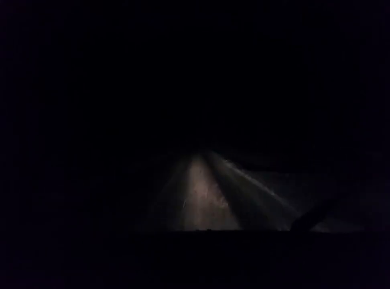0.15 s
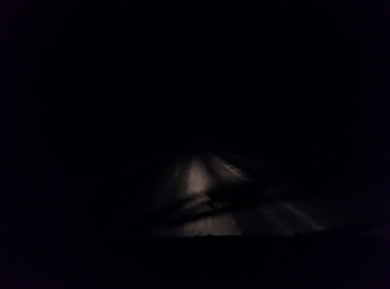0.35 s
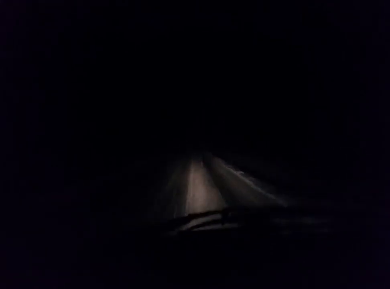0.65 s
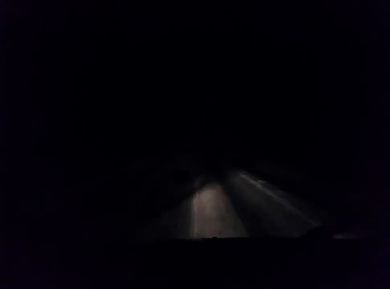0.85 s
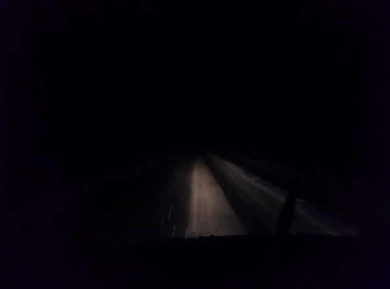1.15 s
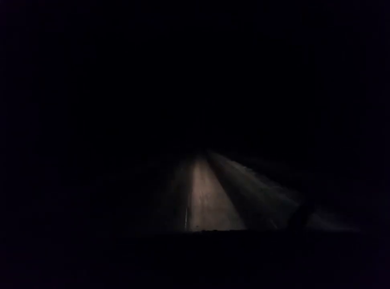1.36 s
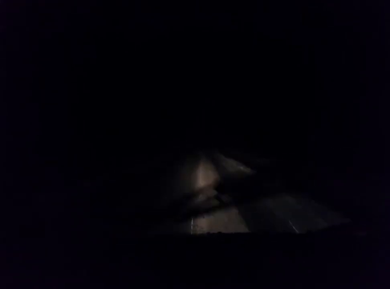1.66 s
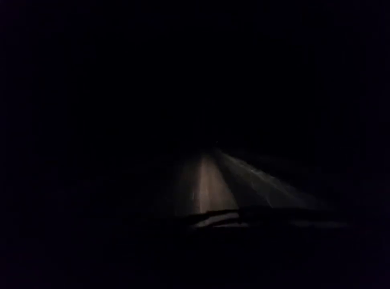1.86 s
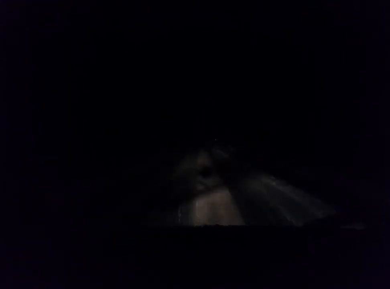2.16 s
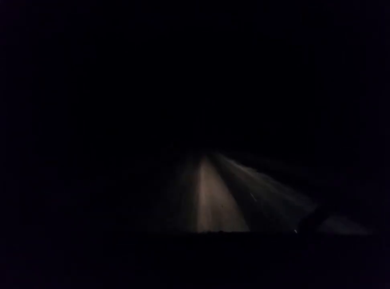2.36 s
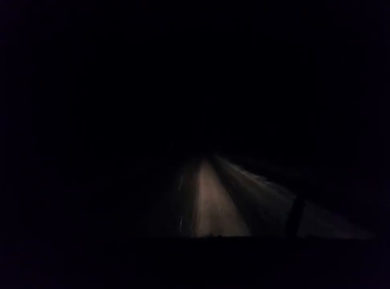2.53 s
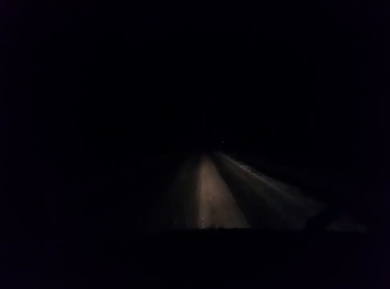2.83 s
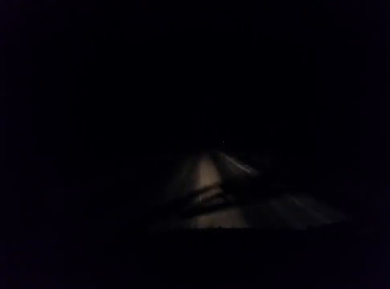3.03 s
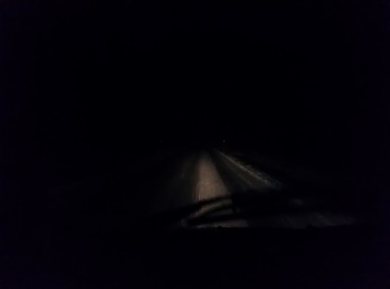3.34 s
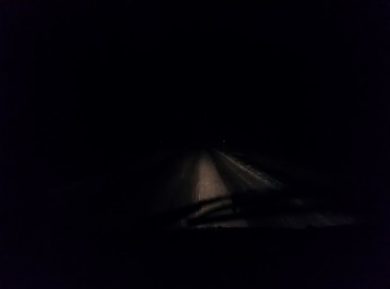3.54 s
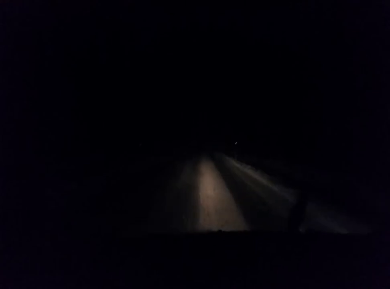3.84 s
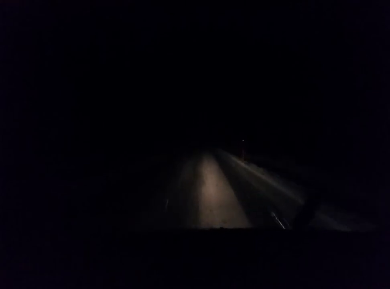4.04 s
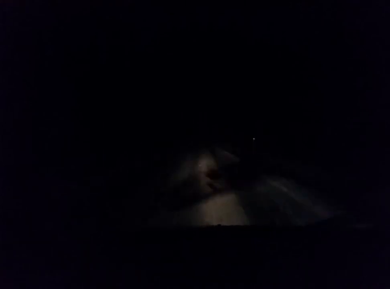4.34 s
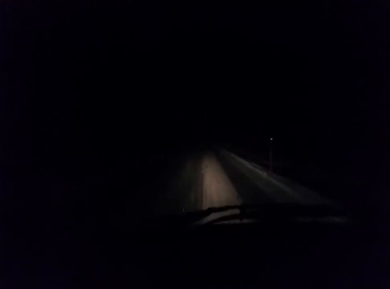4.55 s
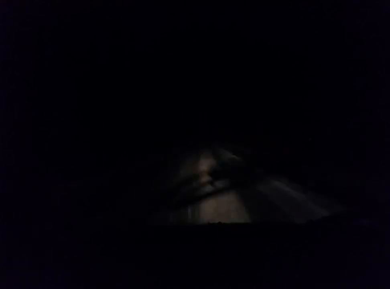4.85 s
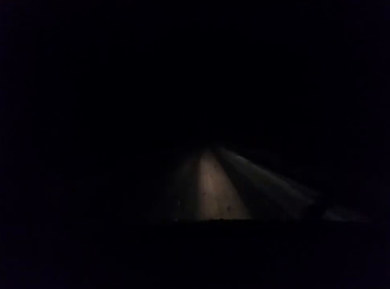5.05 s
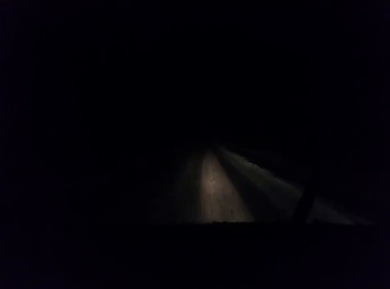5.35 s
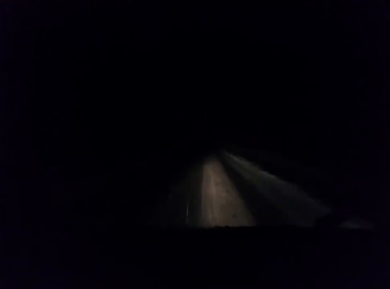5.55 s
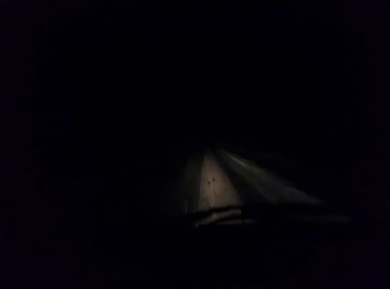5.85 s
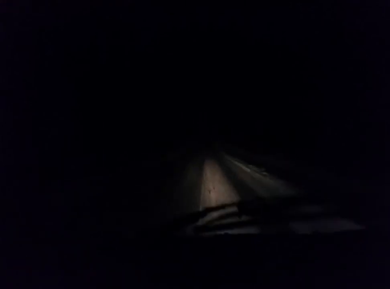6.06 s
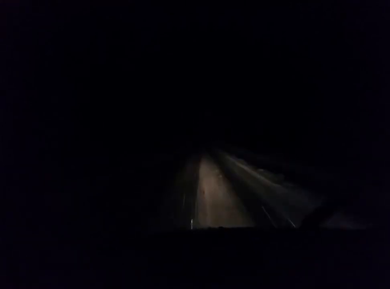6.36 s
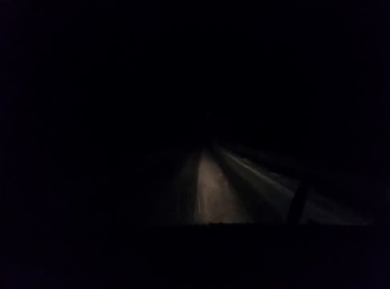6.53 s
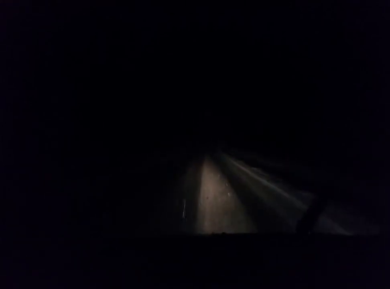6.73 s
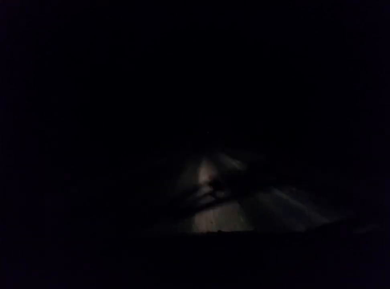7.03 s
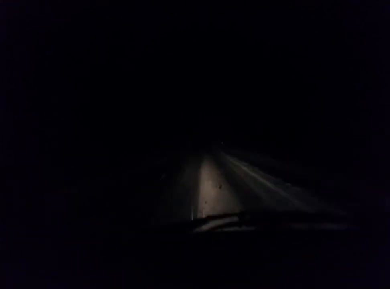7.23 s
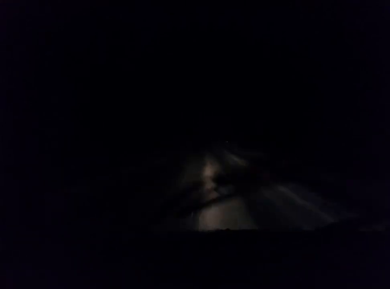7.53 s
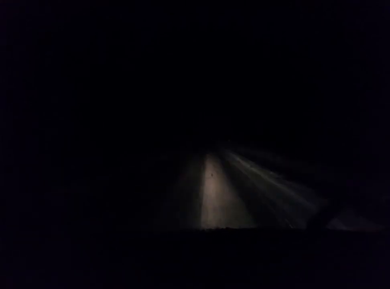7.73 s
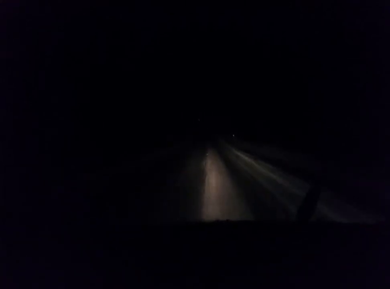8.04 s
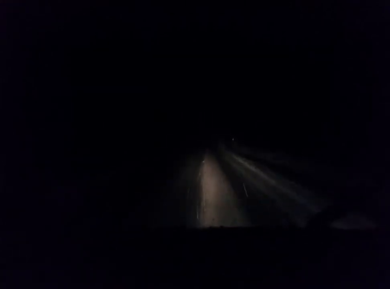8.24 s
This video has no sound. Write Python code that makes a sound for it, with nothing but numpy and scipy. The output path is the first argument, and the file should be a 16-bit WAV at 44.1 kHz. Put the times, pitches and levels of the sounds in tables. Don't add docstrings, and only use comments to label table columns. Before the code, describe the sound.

Inside a car driving on a slushy road at night, heard by a stereo phone on the dashboard. From 0 to 8.4 seconds a low engine hum holds steady revs, wavering slightly in strength, over suspension thumps, body rumble, booming floor panels, broad tyre roar and thin spray hiss. Wipers cross the wet glass throughout. A click at 0.04 leads to a rub and judder at 0.2-0.55. A clear click at 1.45 precedes stuttering drag until 1.9. A loud click at 2.76 is followed by deep groaning and rubbing to 3.2. Another click at 4.08 brings shorter drags until 4.55. A soft, knocking flip at 5.45 precedes the roughest judder and groan, 5.65-5.86. A loud click at 6.77 leads to a longer rub until 7.26. Clicks at 8.14 and 8.23 begin one last drag, cut off with the drone still running.

```python
import sys
import numpy as np
from scipy import signal
from scipy.fft import rfft, irfft
from scipy.io import wavfile
from scipy.ndimage import uniform_filter1d, minimum_filter1d

SR = 44100
rng = np.random.default_rng(int(sys.argv[2]) if len(sys.argv) > 2 else 0)


def to_wav(s):
    ch = np.atleast_2d(s).T
    pcm = np.round(np.clip(ch, -1, 1) * 32767)
    wavfile.write(sys.argv[1], SR, pcm.astype(np.int16))


def invert_db(x):
    u = np.asarray(x, float) / 20
    return 10 ** u


N = 369999
HZ = np.fft.rfftfreq(N, 1 / SR)
TIME = np.arange(N) / SR

# t/s, bumps under the suspension level/dB, slush depth against the usual/dB
ROAD_SURFACE = [(0.0, -23, 2), (0.7, -22, 0.5), (1.1, -18.5, 0), (1.45, -21.5, 0.5), (1.8, -25, 1),
                (2.2, -16.5, 0.5), (2.7, -21.5, 1.5), (3.2, -22.5, -0.5), (3.6, -28.5, -2),
                (4.1, -18, -0.5), (4.9, -22, -1.5), (5.4, -23.5, 0), (5.8, -23, 2), (6.2, -24.5, -1.5),
                (6.7, -21, 0), (7.6, -22.5, -0.5), (8.05, -25.5, -0.5), (8.39, -21, 0.5)]
# f/Hz, level/dB per Hz
GLASS_TONE = [(250, -25.5), (400, 1.5), (500, 2), (800, 0.5), (1000, -8.5), (1400, -10), (2000, -19),
              (3200, -23.5), (3600, -28.5), (5000, -31.5), (7500, -47.5)]


def table(points):
    hz, value = np.transpose(points)
    return np.interp(np.log(HZ + 1), np.log(hz), value)


def curves(rows):
    s, *columns = np.transpose(rows)
    return [np.interp(TIME, s, c) for c in columns]


def unit(x):
    return x / np.sqrt(np.mean(x ** 2))


def walk(rate):
    hold = int(SR / rate)
    steps = np.repeat(rng.standard_normal(N // hold + 1), hold)
    smooth = uniform_filter1d(uniform_filter1d(steps, hold), hold)
    return unit(smooth[:N])


def resonance(hz, width_hz):
    return 1 / (1 + 1j * (HZ - hz ** 2 / (HZ + 1e-9)) / width_hz)


def diffuse(gain, source=1):
    # f/Hz, side minus mid level/dB
    side_points = [(60, -17.5), (110, -20), (200, -12), (370, -8), (680, -8.5), (1240, 1.5), (2270, -1.5),
                   (4170, -0.5), (7630, 5.5), (14000, 6)]
    # f/Hz, left minus right level/dB
    lean_points = [(60, .2), (120, 1.5), (200, 2.3), (370, 1), (700, 1.5), (1240, -1.5), (1900, 3),
                   (3000, 1), (4200, 0), (5000, -2), (5400, -6), (6500, -5), (7500, -2)]
    mid, side = rfft(rng.standard_normal((2, N)) * source) * gain
    side = side * invert_db(table(side_points))
    lean = invert_db(table(lean_points) / 2)
    return unit(irfft(np.array([(mid + side) * lean, (mid - side) / lean]), N))


def strikes(times, peak_db, t60_s):
    out = np.zeros(N)
    for s, db in zip(times, peak_db):
        start = int(s * SR)
        age = TIME[start:int((s + .3) * SR)] - s
        out[start:start + len(age)] += invert_db(db - 60 * age / t60_s)
    return out


def ports(x):
    # f/Hz, width/Hz, level/dB
    port_modes = [
        [(9600, 2620, 2.5), (12630, 2600, -9), (14200, 2500, -16.5)],
        [(9700, 1900, -13), (11740, 1630, -2.5), (14200, 2800, -14)],
    ]
    gains = []
    for modes in port_modes:
        gains.append(sum((-1) ** k * invert_db(db) * resonance(hz, width) ** 2
                         for k, (hz, width, db) in enumerate(modes)))
    return irfft(rfft(x) * np.array(gains), N)


def strokes():
    # start t/s, length/s, drag rise/dB, change over the stroke/dB, squeak against usual/dB
    loads = [(0.225, .09, 8.5, 0, 0), (0.357, 0.15, 6, 0.5, 2.5), (1.52, .07, 3, 2.5, -2.5),
             (1.662, 0.064, 3, 1.5, 2.5), (1.801, 0.054, 3.5, 0.5, 2), (2.535, 0.18, 3.5, -4, -0.5),
             (2.896, 0.071, 8.5, -3, -3), (2.99, .23, 7, -3, 2), (4.2, 0.13, 5.5, 0.5, 1),
             (4.448, .09, 3.5, 0, 1), (5.65, .06, -0.5, 2.5, 1), (5.75, .14, 4, -1, 4.5),
             (6.934, 0.088, 5.5, 1, 0.5), (7.04, .22, 7, 0, -1), (8.225, 0.1, 6.5, -1, 0.5),
             (8.38, .05, 4.5, -2, 4)]
    attack_s, release_s = .04, .03
    rise_db, squeak_db = np.zeros((2, N))
    for s, length, db, change_db, bright_db in loads:
        edges = [s - attack_s, s, s + length, s + length + release_s]
        rise_db = rise_db + np.interp(TIME, edges, [0, db, db + change_db, 0])
        squeak_db = squeak_db + np.interp(TIME, edges, [0, bright_db, bright_db, 0])
    return rise_db, squeak_db


def engine():
    # t/s, level/dB
    load = [(0.0, -13.5), (0.65, -14.5), (1.4, -13), (2.2, -15.5), (2.4, -21), (2.7, -14), (3.4, -17),
            (3.7, -11.5), (4.15, -19), (4.38, -11.5), (4.75, -21), (5.05, -14), (5.7, -18), (6.9, -13.5),
            (7.6, -21), (8.1, -12), (8.39, -16)]
    # multiple of the engine cycle, level against the firing tone/dB
    orders = [(4, -17.5), (5, -25), (12, -13.5), (13, -10.5), (14, -13), (15, -18), (18, -14.5),
              (21, -22.5), (24, -29.5), (26, -36)]
    firing_hz = 61.42
    db, = curves(load)
    cycle = 2 * np.pi * firing_hz * TIME / 6
    tone = np.sin(6 * cycle)
    for multiple, order_db in orders:
        level = invert_db(order_db + 3.1 * walk(3.084))
        start_phase = 2 * np.pi * rng.random()
        tone = tone + level * np.sin(multiple * cycle + start_phase + 0.69 * walk(2.59))
    lean_db = np.array([[.3], [-.3]])
    return np.sqrt(2) * invert_db(db - 1.5 + lean_db) * tone


def suspension():
    # f/Hz, level/dB per Hz
    shake = [(12, -35), (20, -5), (54, -5), (70, -3.5), (91, -14.5), (110, -7.5), (140, -42), (240, -120)]
    bumps_db = curves(ROAD_SURFACE)[0]
    thump_gain = invert_db(np.minimum(table(shake), -9)) * (HZ < 66) * np.clip((HZ - 18) / 24, 0, 1)
    hum_gain = invert_db(table(shake)) * (HZ >= 66) * (HZ < 112)
    thump = invert_db(bumps_db + 3) * diffuse(thump_gain)
    hum = invert_db(-21.5 + 1.8 * walk(4)) * diffuse(hum_gain)
    return thump + hum


def floor_boom():
    # f/Hz, width/Hz, level/dB
    panels = [(123.1, 37, -1), (142.6, 34.7, 0), (193.6, 24, -5.5), (170.5, 16.3, -5)]
    slush_db = curves(ROAD_SURFACE)[1]
    motor_db = 0.54 * uniform_filter1d(strokes()[0], size=8000)
    power = sum(invert_db(2 * db) * abs(resonance(hz, width)) ** 4 for hz, width, db in panels)
    return invert_db(-16.02 + .6 * slush_db + motor_db) * diffuse(np.sqrt(power))


def tyre_roar():
    # f/Hz, level/dB per Hz
    tread = [(120, -42), (200, -2), (222, -11), (255, -4.5), (288, -10), (351, -14.5), (468, -13),
             (512, -17), (715, -18.5), (1060, -41.5), (1350, -23.5), (1620, -39), (2100, -29.5),
             (3680, -56.5), (7500, -58.5), (9750, -86.5), (16500, -120)]
    roar, swell = 0, walk(1.58)
    for hz in 200 * 2 ** np.arange(0, 5.6, .7):
        octaves_away = abs(np.log2((HZ + 1) / hz))
        share = np.clip(1 - octaves_away / 0.678, 0, 1)
        gain = invert_db(table(tread)) * np.sqrt(share)
        wander = invert_db(0.69 * swell + 1.02 * walk(7))
        roar = roar + np.linalg.norm(gain) * wander * diffuse(gain)
    return invert_db(-26.5) * unit(roar)


def spray():
    slush_db = curves(ROAD_SURFACE)[1]
    drops = rng.standard_normal((2, N)) * invert_db(.7 * walk(12))
    return invert_db(-48 + slush_db + 0.11 * strokes()[0]) * unit(ports(drops))


def wiper_drag():
    rise_db, bright_db = strokes()
    glide_db = -33 + 1.3 * curves(ROAD_SURFACE)[1] + 0.9 * walk(9)
    drag_db = glide_db + rise_db
    arm_db = glide_db + 0.53 * rise_db + 4.5
    squeak_db = drag_db + bright_db - 12.5
    film_db = glide_db + .5 * (rise_db + bright_db) - 19.5
    grains = invert_db(.8 * walk(40) + 1.2 * walk(300))
    glass = invert_db(table(GLASS_TONE))
    dull = 1 / np.hypot(1, (HZ / 1650) ** 4)
    bright = 1 / np.hypot(1, (HZ / 3500) ** 6)
    drag = invert_db(drag_db) * diffuse(glass * dull, grains)
    arm = invert_db(arm_db) * diffuse(abs(resonance(274, 140)) ** 2)
    squeak = invert_db(squeak_db) * diffuse(glass * bright * np.sqrt(1 - dull ** 2), grains)
    film = invert_db(film_db) * diffuse(glass * np.sqrt(1 - bright ** 2))
    return drag + arm + squeak + film


def lip_flips():
    # t/s, peak level/dB, glass knock against the peak/dB
    turns = [
        (0.0407, -25, -13),
        (1.4455, -27, -18),
        (2.763, -17, -15),
        (4.077, -24, -13),
        (4.5155, -38, -5),
        (5.4509, -29, -3),
        (6.767, -19, -16),
        (7.075, -33, -8),
        (8.1413, -21, -13),
        (8.2296, -29, -7),
    ]
    s, db, knock_db = np.transpose(turns)
    s = s + .0016
    snap = np.zeros(N)
    snap[(s * SR).astype(int)] = invert_db(db + 20)
    tail = strikes(s + 0.0021, db - 5.5, 0.078) + strikes(s + 0.0013, db - 8, .02)
    click = ports(snap + tail * rng.standard_normal((2, N)))
    tick = invert_db(-7) * irfft(rfft(snap) * resonance(13600, 4000) ** 2, N)
    ring = strikes(s + 0.0014, db + knock_db + 16.5, .035) * rng.standard_normal((2, N))
    glass_gain = 1.4 * resonance(2700, 850) ** 2 - invert_db(-14) * resonance(4800, 2500) ** 2
    knock = irfft(rfft(ring + invert_db(-11) * snap) * glass_gain, N)
    return click + tick + knock


def judders():
    # t/s, peak level/dB
    jumps = [(0.1974, -26.5), (0.2383, -27), (0.375, -14), (0.4808, -24), (0.5267, -21), (1.654, -20),
             (1.7374, -22), (1.7975, -21.5), (1.8442, -16.5), (1.8845, -23), (3.033, -22), (3.19, -23),
             (4.23, -18), (4.309, -22), (4.4442, -20.5), (4.4787, -25), (5.657, -13.5), (5.7268, -19.5),
             (5.7616, -12.5), (5.8096, -30), (5.858, -15.5), (6.9252, -30), (7.075, -15), (7.141, -20),
             (8.3124, -33)]
    s, db = np.transpose(jumps)
    bright = 1 / np.hypot(1, (HZ / 3500) ** 6)
    gain = invert_db(table(GLASS_TONE)) * bright ** 0.85 * np.clip(HZ / 2100, 0, 1) ** 1.36
    return strikes(s + 0.0012, db - 9, .07) * diffuse(gain)


def groans():
    # middle t/s, length/s, f/Hz, level/dB
    strains = [(0.34, 0.3, 237.9, -22), (1.623, 0.12, 187, -19), (1.823, 0.062, 240, -21),
               (2.85, 0.26, 198, -18.5), (2.98, 0.12, 270.4, -23.5), (2.909, 0.035, 690, -27),
               (4.178, 0.11, 215, -23), (5.701, 0.15, 198, -13), (5.81, 0.065, 227.5, -23.5),
               (7.096, 0.5, 240, -25), (7.115, 0.076, 276.6, -25.5), (8.299, 0.16, 250.4, -22.5),
               (0.36, .3, 123, -18.5), (1.597, .3, 124, -19.5), (2.853, 0.25, 138, -16),
               (3.016, 0.34, 126, -12), (4.28, 0.27, 128, -23.5), (6.75, .3, 140, -19),
               (8.317, 0.13, 124, -14)]
    out, waver = 0, np.cumsum(walk(15)) / SR
    for s, length, hz, db in strains:
        swell = np.exp(-(2 * (TIME - s) / length) ** 2)
        out = out + invert_db(db + 5) * swell * np.sin(2 * np.pi * hz * (TIME + 0.02075 * waver))
    return out * invert_db(np.array([[1.5], [-1.5]]))


def scene():
    driving = engine() + suspension() + floor_boom() + tyre_roar() + spray()
    wiping = lip_flips() + wiper_drag() + judders() + groans()
    return driving + wiping


def top_cut(x):
    return signal.sosfilt(signal.butter(12, 14590, fs=SR, output="sos"), x)


def record(dry):
    limit_db, top_hz = -1.8, 14550
    over = np.minimum(1, invert_db(limit_db) / (abs(dry).max(axis=0) + 1e-9)) ** 0.7
    gain = uniform_filter1d(minimum_filter1d(over, size=800), size=800)
    soft = irfft(rfft(dry * gain) * (HZ < top_hz), N)
    return top_cut(soft)


dry = scene()
out = record(dry)
to_wav(out)
```